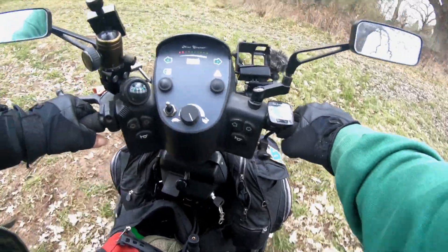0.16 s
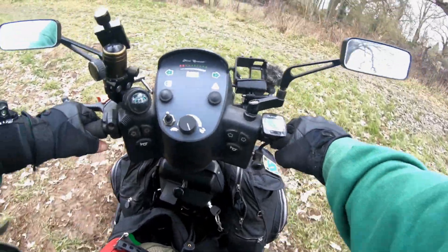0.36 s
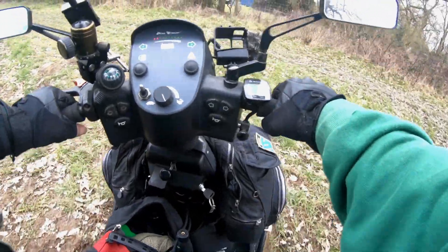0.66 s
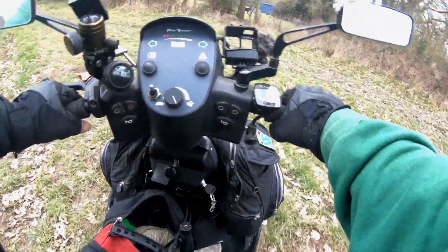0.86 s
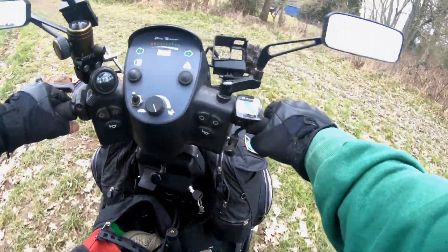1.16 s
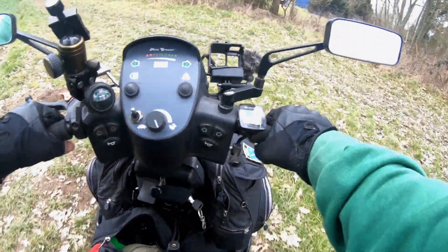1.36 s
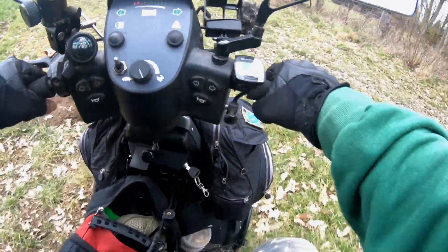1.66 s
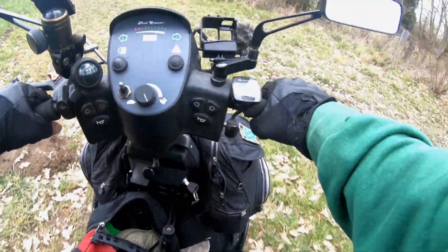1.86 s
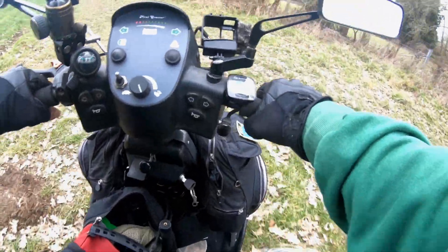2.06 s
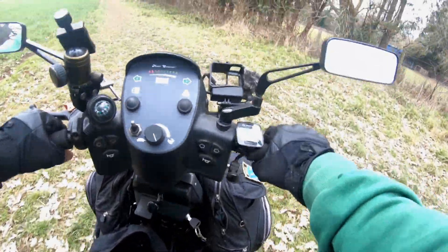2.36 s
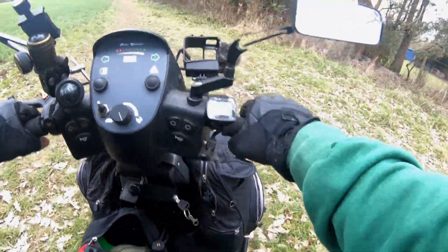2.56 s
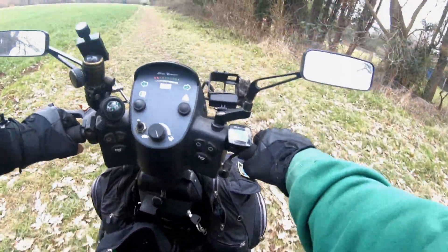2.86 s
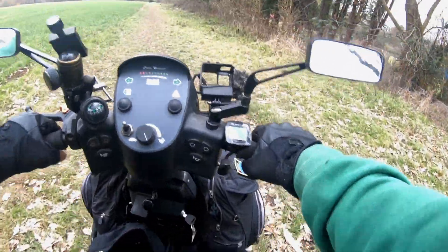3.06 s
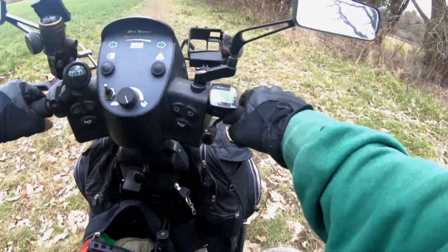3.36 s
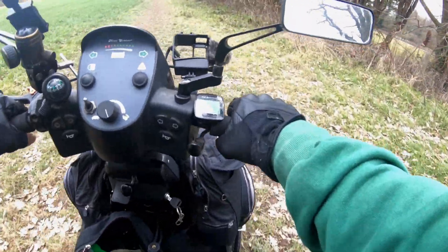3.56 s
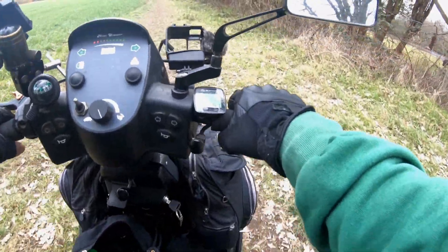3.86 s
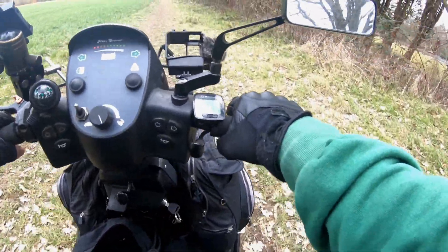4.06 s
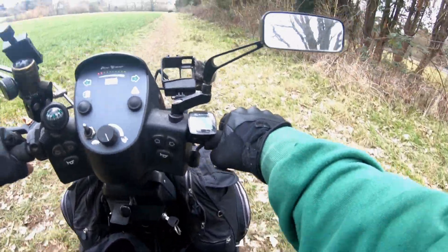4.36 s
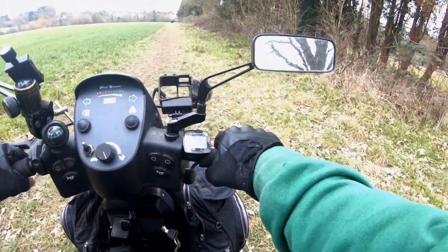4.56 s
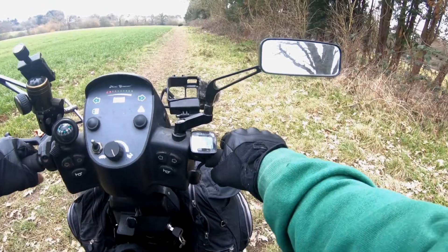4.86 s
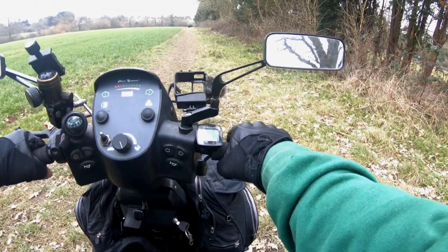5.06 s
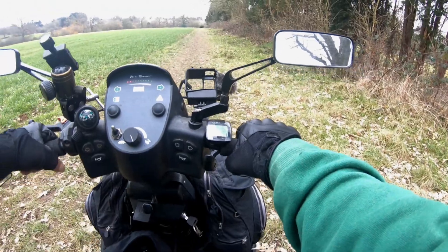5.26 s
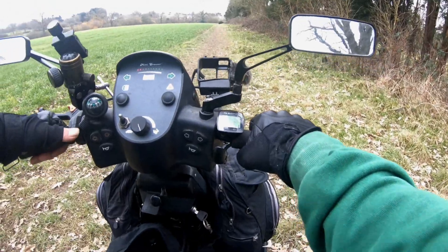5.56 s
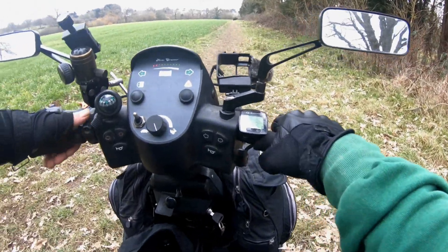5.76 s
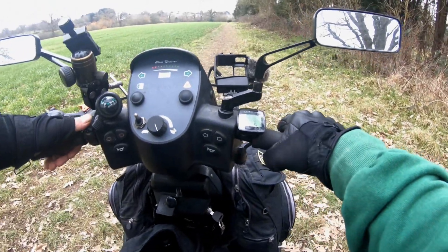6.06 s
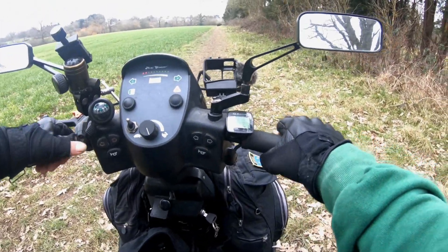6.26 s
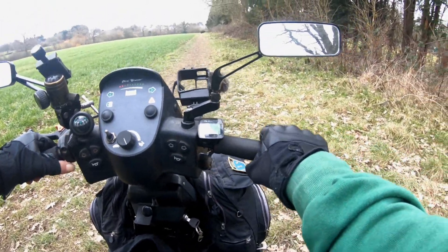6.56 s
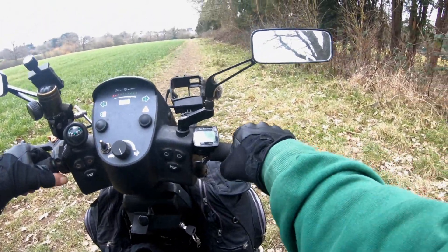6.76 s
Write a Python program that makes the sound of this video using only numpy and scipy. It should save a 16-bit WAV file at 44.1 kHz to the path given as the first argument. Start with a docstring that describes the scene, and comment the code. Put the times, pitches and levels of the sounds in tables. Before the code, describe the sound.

Hollow thumps, panel knocks and metallic rattles from a scooter on bumpy ground, with crackling leaves and thin bird notes, easing into quiet.

```python
"""Mobility scooter on a bumpy track

An electric scooter rolls over leaf-strewn grass and slows down, heard at the rider's chest. Filtered noise
rocks the microphone, booms in the plastic body and crackles as leaves. Fading tones make the knocks and ticks;
sliding tones make the braking motor's whine and a small bird's falling notes in the hedge."""
import sys
import numpy as np
from scipy import signal
from scipy.fft import rfft, irfft, next_fast_len
from scipy.io import wavfile
from scipy.ndimage import uniform_filter1d, map_coordinates

SR = 44100
rng = np.random.default_rng(int(sys.argv[2]) if len(sys.argv) > 2 else 0)


def output_pcm(signal):
    """Save a mono or channel-first signal as 16-bit PCM at the path in sys.argv[1].

    Samples are clipped to [-1, 1] before scaling.
    """
    pcm = np.clip(np.atleast_2d(signal).T, -1, 1) * 32767
    wavfile.write(sys.argv[1], SR, np.round(pcm).astype(np.int16))


N = 304290
T = np.arange(N) / SR  # time of each sample [s]

# How the ride drives the wheels and leaves, before boom() turns the shaking down:
# (time [s], body shaking [dB], leaf crackle [dB], tyre roll [dB])
RIDE_LEVELS = [(0.0, -38, -56.5, -54), (0.2, -35.5, -56.5, -53.5), (0.6, -34, -56.5, -53),
               (1.0, -32.5, -56.5, -51), (1.3, -33, -57.5, -56), (1.62, -32, -53.5, -50.5),
               (2.0, -30, -54.5, -56), (2.25, -30.5, -49, -48), (2.5, -33.5, -52, -49.5),
               (2.8, -32.5, -58, -46.5), (3.08, -35, -54, -54), (3.5, -34.5, -56, -56),
               (3.85, -35.5, -50, -53.5), (3.97, -38, -60.5, -60), (4.2, -35, -58.5, -56),
               (4.6, -38.5, -60.5, -56), (4.85, -43.5, -67, -59.5), (5.05, -50, -71, -60.5),
               (5.3, -44.5, -66, -58), (5.55, -50, -60.5, -58), (6.05, -53.5, -66, -64.5),
               (6.35, -50, -61, -61.5), (6.9, -59, -63.5, -59)]
# Ringing of the hollow plastic shell: (frequency [Hz], width [Hz], level [dB])
SHELL_MODES = [(257.5, 28.2, -4), (332.7, 35.4, -5), (351.8, 40.8, -5.5), (426, 13, -23.5)]
# Ringing of the wheel mounting, applied twice: (frequency [Hz], width of one pass [Hz], level [dB])
WHEEL_MODES = [(210.5, 65.6, 0)]
# Thuds of a wheel on a lump, before boom() turns them down:
# (time [s], strength [dB], wheel mounting relative to shell [dB])
BUMPS_HIT = [(0.038, -38, 14), (0.113, -25.5, -6), (0.19, -30.5, -4), (0.25, -39, 10), (0.39, -55, -2),
             (0.519, -34, 4), (0.676, -24.5, -7), (0.846, -25.5, -4), (0.95, -50, 21), (1.17, -37, -12),
             (1.55, -33.5, 6), (2.129, -21.5, -11), (2.209, -17, -0.5), (2.33, -32, -13), (2.57, -32, -7),
             (2.66, -31, -15), (2.75, -23, -25), (2.84, -28, -3), (3.02, -41.5, 8), (3.19, -40, 16),
             (3.245, -30, 3), (3.298, -26, 5), (3.38, -48, 20.5), (3.469, -32.5, 6), (3.52, -43, 16),
             (3.56, -49, 10), (3.66, -51, 20), (3.75, -47, 14), (3.982, -29.5, 3.5), (4.059, -24, -8),
             (4.15, -38, -20), (4.458, -37.5, 7.5), (5.268, -44.5, 3), (5.31, -51, -5), (5.38, -43, -1),
             (5.45, -43, -9), (5.7, -51, -2), (5.82, -50, -6), (5.979, -42.5, -4.5), (6.26, -47, 1),
             (6.378, -45, -23), (6.42, -43, -20), (6.455, -41, -21), (6.5, -42, -20), (6.549, -39.5, -9),
             (6.63, -43, -3), (6.66, -44, -8), (6.891, -41.5, -19)]
BUMP_RISE_S, BUMP_FALL_S = 0.018, 0.025
STEADY_S = 0.018  # a thud's ring keeps an even strength over this time
# wheel mounting relative to shell; extra gain per dB of shaking; random swing
WHEEL_DB, WHEEL_GROWS, WHEEL_SWING_DB = 1.5, 0.53, 1

# Panels knocking: (time [s], peak [dB], favoured frequency [Hz], change per octave from KNOCK_HZ [dB])
PANEL_KNOCKS = [(0.108, -15.5, 1110, 0), (0.112, -19, 470, -8), (0.237, -21, 546, -2.5),
                (0.32, -24.5, 517, -7), (0.385, -30, 536, -14), (0.485, -24, 528, -2.5),
                (0.562, -30.5, 485, -9), (0.666, -17.5, 543, 1.5), (0.834, -26.5, 880, -1),
                (1.024, -25, 482, 3), (1.111, -31, 482, -9), (1.158, -23.5, 573, -4),
                (1.313, -24.5, 585, -5), (1.544, -23.5, 890, -0.5), (1.589, -20.5, 649, -5.5),
                (1.955, -24.5, 566, -6.5), (2.016, -30, 547, -7), (2.062, -31, 622, -7),
                (2.133, -18, 511, -1), (2.192, -20.5, 522, -3), (2.206, -18.5, 517, -2.5),
                (2.303, -22, 854, -3), (2.556, -17, 519, -8), (2.596, -29, 576, -14),
                (2.615, -21.5, 525, -12), (2.673, -25, 536, -10), (2.688, -18, 510, -3),
                (2.728, -26.5, 595, -15), (2.906, -26, 485, -14), (2.948, -33, 506, -7),
                (3.124, -29, 528, -8), (3.138, -31, 554, -10), (3.235, -28.5, 525, -3),
                (3.293, -28.5, 627, -8), (3.298, -24, 856, -6.5), (3.401, -35, 490, -9),
                (3.467, -32.5, 534, -11), (3.52, -31.5, 490, -9), (3.576, -33, 495, -5),
                (3.612, -35, 560, -5), (3.701, -37, 482, -3), (3.752, -31.5, 501, -8),
                (3.966, -31, 533, -3), (4.038, -32, 633, -5), (4.051, -25.5, 533, -5),
                (4.094, -25, 480, -7), (4.132, -26.5, 557, -9), (4.14, -25, 1040, -10),
                (4.181, -24.5, 482, -6.5), (4.191, -29, 592, -7), (4.261, -33, 550, -9),
                (4.771, -34.5, 536, -11), (5.441, -34, 474, -10), (6.235, -34.5, 711, -6),
                (6.353, -34, 745, 2.5), (6.357, -26, 746, -4.5), (6.407, -38, 560, -11),
                (6.538, -35.5, 1000, -4), (6.689, -38, 505, -7)]
# Ringing of the panels: (frequency [Hz], level [dB])
PANEL_MODES = [(355, 2.5), (415, 2.5), (520, 2), (630, -4.5), (740, 1), (900, 6.5), (1020, -8.5),
               (1150, 3.5), (1350, -5), (1500, -6.5), (1700, -9.5), (1870, -31), (2050, -16), (2330, -23),
               (2600, -42), (3000, 0.5), (3500, -6.5)]
KNOCK_HZ, KNOCK_CHATTER_S = 422, 0.008
FAVOUR_DB, FAVOUR_OCTAVES = 5.5, 0.14  # lift of the modes near the struck spot; its width
STRAY_KNOCKS = 50
STRAY_KNOCK_DB, STRAY_BRIGHT_DB = -1, -8  # mid values: relative to shaking; change per octave

# Loose fittings ticking: (time [s], peak of the ring [dB], favoured frequency [Hz])
FITTING_TICKS = [(0.0154, -42, 3360), (0.1052, -22, 3140), (0.1834, -46, 5000), (0.1984, -43, 5000),
                 (0.2369, -40.5, 3020), (0.5526, -41, 4500), (0.5731, -42, 4000), (0.6195, -44, 4000),
                 (0.6674, -36, 4550), (0.682, -38, 4500), (0.697, -36, 4800), (0.706, -44, 4400),
                 (0.7214, -41, 2960), (0.833, -39, 3500), (0.857, -31, 3070), (0.8814, -36, 4580),
                 (1.0221, -33, 4370), (1.029, -40, 3000), (1.1563, -45, 2340), (1.186, -47, 3800),
                 (1.237, -47, 4200), (1.265, -49, 5300), (1.281, -57, 4800), (1.3139, -37, 4000),
                 (1.34, -45, 3000), (1.45, -49, 5000), (1.505, -45, 4600), (1.5833, -43, 2300),
                 (1.592, -36.5, 4680), (1.678, -43.5, 3000), (1.7295, -38.5, 3500), (1.75, -41, 5000),
                 (1.81, -45, 4300), (1.83, -43.5, 4300), (1.91, -50, 4000), (1.936, -44, 4000),
                 (1.9579, -41, 6000), (1.98, -54, 6300), (2.005, -45, 4500), (2.02, -50, 4200),
                 (2.0882, -36, 5500), (2.1131, -31, 2330), (2.1284, -32, 4480), (2.163, -42, 8400),
                 (2.1905, -24, 4500), (2.208, -32, 4000), (2.2288, -30, 4350), (2.243, -37, 4500),
                 (2.252, -38, 4500), (2.26, -47, 3300), (2.278, -56, 4400), (2.3082, -34, 4250),
                 (2.3526, -37, 2870), (2.5356, -35, 2780), (2.5704, -47, 3590), (2.687, -44, 2480),
                 (2.7028, -29.5, 4370), (2.7746, -12, 4200), (2.8, -33, 4700), (2.8254, -43, 2320),
                 (2.834, -39, 3800), (2.841, -40, 3500), (2.8534, -43, 7000), (2.8863, -36, 2920),
                 (2.8974, -36.5, 3500), (2.906, -39, 3200), (2.915, -40, 3600), (2.926, -42, 3500),
                 (2.976, -47, 3500), (3.019, -55, 5500), (3.1208, -41, 4280), (3.225, -42, 3500),
                 (3.2944, -36, 2830), (3.4416, -36, 3500), (3.4644, -43, 3290), (3.69, -43, 3310),
                 (3.8033, -42, 2890), (3.9679, -37.5, 4260), (3.984, -45, 4200), (4.037, -47, 2900),
                 (4.0542, -45, 4500), (4.064, -42, 3600), (4.076, -45, 4300), (4.115, -45, 4000),
                 (4.1315, -43, 3230), (4.151, -45, 4800), (4.183, -47, 3500), (4.215, -48, 3300),
                 (4.231, -50, 3500), (4.4608, -41, 3500), (4.69, -47, 3500), (4.72, -53, 4300),
                 (4.7401, -45, 4000), (4.7721, -47, 3260), (5.1781, -53, 2800), (5.2175, -51, 4000),
                 (5.245, -48.5, 3770), (5.3732, -40.5, 3480), (5.4395, -41.5, 2400), (6.2083, -48, 3300),
                 (6.2332, -39, 4400), (6.3565, -45, 3600), (6.536, -39, 4940), (6.542, -47, 3600)]
# Ringing of the fittings: (frequency [Hz], level [dB])
FITTING_MODES = [(2400, 3), (2900, 2), (3354, 12), (3650, 10), (3950, 5), (4366, 13.5), (4780, 12),
                 (5329, 8.5), (5700, 0.5), (6150, -12), (6700, -8), (7300, -13), (8350, 4.5), (9400, -28),
                 (11300, -36), (13800, -40)]
# level per octave away from the favoured mode; chatter of the loudest; 60 dB decay of the lowest mode
TICK_FOCUS_DB, TICK_CHATTER_S, TICK_T60_S = -11.5, 0.0021, 0.0084
CHATTER_GROWS = 0.21  # softer contacts chatter longer: dB of length per dB under the loudest
# bright snap of the loudest tick, before its colouring; 60 dB decay; gain per dB of tick
CRACK_DB, CRACK_S, CRACK_GROWS = -29.5, 0.003, 0.57
# Colour of that snap, strongest near 6 kHz: filter weights, one per sample
CRACK_COLOUR = [1, 2, 0, -2, -1]
STRAY_TICKS = 80
JINGLE_DB, STRAY_DB = -12, 6.5  # relative to the crackle: faint contacts; middle of the stray ticks

# A bag rubbing the shell: (time [s], length before stretching by half [s], level [dB], added sizzle [dB])
BAG_SCRAPES = [(0.536, 0.025, -48, -11), (0.654, 0.057, -46.5, -9), (2.205, 0.047, -43, -12),
               (2.297, 0.02, -37, -23), (2.645, 0.064, -55, -10.5), (2.65, 0.19, -48.5, -14),
               (2.824, 0.026, -61, -23), (2.875, 0.045, -55, -9), (3.114, 0.035, -51.5, -19),
               (3.437, 0.074, -52, -14), (3.707, 0.1, -62, -23), (4.023, 0.089, -51, -14),
               (4.5, 0.029, -65, -25), (4.676, 0.072, -59.5, -16), (5.206, 0.026, -63, -18),
               (0.863, 0.026, -47, -27), (1.9, 0.13, -56, -12), (3.953, 0.026, -50, -25),
               (6.525, 0.015, -60, -31)]
# Tone colour of the rub: (frequency [Hz], relative level [dB])
RUB_COLOUR = [(1500, -36), (2300, 0.5), (3300, -2.5), (4400, 6), (5300, -6), (6500, -12), (9000, -70)]
# Tone colour of the sizzle: (frequency [Hz], relative level [dB])
SIZZLE_COLOUR = [(5500, -57), (7500, -8), (8800, -3), (10000, -17), (13000, -28), (15700, -35)]
# Squeaking joints: (time [s], length [s], pitch [Hz], level [dB])
JOINT_SQUEAKS = [(0.767, 0.12, 2080, -52.5), (1.045, 0.15, 4200, -64), (1.289, 0.12, 3410, -59),
                 (1.763, 0.025, 2700, -59), (2.012, 0.12, 4080, -58), (2.347, 0.18, 4380, -58),
                 (2.715, 0.3, 2276, -54), (3.603, 0.25, 4540, -63), (4.496, 0.062, 2930, -54.5),
                 (5.2, 0.15, 4700, -70)]

# Strength of the low movement: (time [s], rocking before the seat limits it [dB], buffeting [dB])
HEAVE_LEVELS = [(0.0, -18.5, -26), (0.17, -5, -26.5), (0.35, -10.5, -29.5), (1.4, -15.5, -33),
                (1.55, -6, -27), (1.88, -17.5, -34), (2.15, -5, -29.5), (2.42, -13, -35.5),
                (2.98, -12, -34), (3.35, -11.5, -33.5), (3.55, -20, -34), (3.8, -17, -31), (3.96, -27, -35),
                (4.08, -16.5, -29), (4.7, -24, -38), (4.9, -17.5, -43), (5.3, -28.5, -39.5),
                (6.9, -27.5, -41)]
# Spectrum of the rocking: (frequency [Hz], relative level [dB])
SWAY_COLOUR = [(.5, -7), (2, 4.5), (8, 2), (14, -23), (22, -76), (40, -120)]
# Spectrum of the buffeting: (frequency [Hz], relative level [dB])
BUFFET_COLOUR = [(10, -53), (18, 0.5), (40, -6), (75, -18.5), (120, -18), (160, -25.5), (220, -32.5),
                 (400, -120)]

# Tone colour of dry leaves: (frequency [Hz], relative level [dB])
LEAF_COLOUR = [(1060, -3), (1800, -8), (2080, -6), (2450, -7), (3040, -4), (3320, -7), (3840, -5.5),
               (4470, -6), (7340, -19), (11600, -31), (15500, -39)]
# Tone colour of rubber on grass: (frequency [Hz], relative level [dB])
ROLL_COLOUR = [(240, -44), (400, 0), (486, 2.5), (661, -5.5), (815, 0), (912, -1.5), (976, -7),
               (1240, -4.5), (2400, -18), (3120, -49), (5280, -120)]
# leaves breaking: average rate; level relative to crackle; scale of the scatter; 60 dB decay
SNAPS_PER_S, SNAP_DB, SNAP_SPREAD_DB, SNAP_T60_S = 70, -10, 4.5, 0.0094
# A tyre crushing a drift of dry leaves: (time [s], length [s], level [dB])
LEAF_CRUNCHES = [(0.66, 0.07, -65), (1.002, 0.043, -65), (1.93, 0.06, -69), (2.207, 0.073, -63),
                 (2.29, 0.04, -70), (2.66, 0.18, -58), (2.773, 0.16, -68), (2.86, 0.19, -65.5),
                 (3.43, 0.1, -75), (3.698, 0.1, -71), (4.042, 0.096, -67)]
# Tone colour of the crunch: (frequency [Hz], relative level [dB])
CRISP_COLOUR = [(4000, -40), (6500, -2), (9000, 2), (11000, -2), (13000, -6), (15700, -3)]

# Whine while braking: (time [s], gear mesh frequency [Hz])
WHINE_PITCH = [(4.5, 545), (4.62, 497), (4.72, 425), (4.8, 356), (4.86, 310.5), (4.92, 290.3),
               (4.97, 253.7), (5.09, 180), (5.26, 118.3)]
# How loud the main whine comes through the casing: (frequency [Hz], level [dB])
HOUSING_LEVELS = [(170, -70), (205, -55), (245, -51), (270, -46), (295, -41), (345, -41), (375, -51),
                  (400, -62), (425, -46), (460, -50), (500, -50), (520, -56), (560, -75)]
# tone at twice the gear frequency: level; centre and half-width of the range where it sounds
SECOND_DB, SECOND_HZ, SECOND_WIDTH_HZ = -57, 375, 145

# Falling notes: (start [s], length [s], start pitch [Hz], fall before the hook [Hz], level [dB])
BIRD_NOTES = [(-.01, 0.096, 7650, 1200, -56), (0.137, 0.099, 7170, 1530, -56),
              (0.303, 0.079, 6620, 1060, -56), (2.265, 0.11, 7780, 580, -57.5),
              (2.479, 0.114, 7650, 840, -58.5), (2.701, 0.072, 6800, 1050, -50.5),
              (2.9, 0.076, 6670, 1004, -55.5)]
HOOK_HZ = 600  # last quick drop of a note
# Faint chirps: (time [s], start pitch [Hz], peak [dB])
DISTANT_CHIRPS = [(1.443, 7840, -66), (1.727, 7900, -59), (4.39, 7850, -61), (5.75, 7300, -69),
                  (5.88, 7400, -68), (6.17, 7240, -68)]
CHIRP_S = 0.021

# Swelling of a narrow hiss, before hiss() turns it down: (time [s], level [dB])
HISS_LEVELS = [(4.3, -72), (4.41, -61), (4.92, -91), (5.21, -74), (5.43, -72), (5.59, -65), (5.76, -79),
               (5.97, -68), (6.33, -71), (6.78, -62), (6.9, -66)]
# Resonance of the hiss, applied twice: (frequency [Hz], width of one pass [Hz], level [dB])
HISS_MODES = [(4310, 490, 0)]
# Tone colour of the quiet air: (frequency [Hz], relative level [dB])
AIR_COLOUR = [(88, -44), (150, -29), (259, 10), (320, -19.5), (620, -16.5), (988, -1), (2460, -18.5),
              (3700, -22), (4590, -26), (5500, -29), (6770, -29.5), (13600, -33.5), (15600, -40)]
AIR_DB = -57.5
TOP_HZ = 15780  # nothing passes above this


def amp(db):
    """dB to gain."""
    return 10 ** (np.asarray(db) / 20)


def unit(x):
    """Scaled to an average strength (rms) of 1."""
    return x / np.sqrt(np.mean(x ** 2) + 1e-20)


def curves(rows):
    """One value per sample for each column after the time."""
    s, *cols = np.transpose(rows)
    return [np.interp(T, s, c) for c in cols]


def wobble(rate):
    """A smooth random curve with rate random points a second."""
    points = rng.standard_normal(int(N * rate / SR) + 4)
    return map_coordinates(points, [T * rate])


def filtered(x, response):
    """x with each frequency scaled by response, which may also shift its phase."""
    m = next_fast_len(N + SR // 2)
    return irfft(rfft(x, m) * response(np.fft.rfftfreq(m, 1 / SR)), m)[..., :N]


def coloured(x, points):
    """x filtered by a (frequency [Hz], level [dB]) curve, at rms 1."""
    f, db = np.transpose(points)
    return unit(filtered(x, lambda hz: amp(np.interp(np.log(hz + .1), np.log(f + .1), db))))


def resonant(x, modes):
    """x through resonances given as (frequency [Hz], width [Hz], level [dB]), with alternating signs."""
    def response(f):
        return sum((-1) ** k * amp(db) * 1j * f * w / (c * c - f * f + 1j * f * w)
                   for k, (c, w, db) in enumerate(modes))
    return filtered(x, response)


def steady(x):
    """x with its random swells evened out, at rms 1."""
    power = np.abs(uniform_filter1d(x ** 2, round(STEADY_S * SR)))
    return unit(x / np.sqrt(power + .05))


def grainy(spread_db, rate, clump_db):
    """Noise whose samples come in uneven, clumped sizes."""
    size = amp(spread_db * np.minimum(rng.exponential(size=N), 5) + clump_db * wobble(rate))
    return unit(size * rng.standard_normal(N))


def blow(modes, gains_db, t60, chatter, size):
    """Fading tones with random strengths, driven by a short ragged run of contacts, peak 1."""
    t = np.arange(size) / SR
    hz, db = np.transpose(modes)
    draw = rng.standard_normal((2, len(hz)))
    gain = amp(db + gains_db(hz) + 2.5 * draw[0])
    life = t60 * (hz[:, None] / hz[0]) ** -.4  # high modes die sooner
    detuned = hz * (1 + 0.015 * draw[1])
    ring = amp(-60 * t / life) * np.sin(2 * np.pi * np.outer(detuned, t))
    ring *= 1 - np.exp(-t / 0.00057)  # soft onset
    fade = np.exp(-t / max(chatter, .0005))
    contacts = rng.standard_normal(len(t)) ** 3 * fade * (1 + np.minimum(t / 0.00092, 1))
    contacts[0] = 4  # the first contact is firm
    driven = signal.fftconvolve(ring, contacts[None], axes=1)[:, :len(t)]
    # each mode keeps its strength
    strength = gain * np.linalg.norm(ring, axis=1) / np.linalg.norm(driven, axis=1)
    ring = strength @ driven
    return ring / np.abs(ring).max()


def boom():
    """Lumpy ground jolts the wheels; tyres and springs pass only a band of jolts to the hollow body."""
    shake_db = curves(RIDE_LEVELS)[0]
    shell = amp(shake_db + 0.49 * wobble(9))
    wheel_db = WHEEL_DB + WHEEL_GROWS * (shake_db - shake_db.mean()) + WHEEL_SWING_DB * wobble(15)
    wheel = shell * amp(wheel_db)
    shell_thud, wheel_thud = np.zeros((2, N))
    for s, db, extra_db in BUMPS_HIT:
        width = np.where(T < s, BUMP_RISE_S, BUMP_FALL_S)
        thud = amp(db) * np.exp(-((T - s) / width) ** 2)
        shell_thud += thud
        wheel_thud += amp(extra_db) * thud

    def suspension(f):
        return (1j * f / 170) ** 3 / (1 + 1j * f / 170) ** 3 / (1 + 1j * f / 500)

    jolts = filtered(grainy(spread_db=2.5, rate=47, clump_db=-1.5), suspension)
    body = unit(resonant(jolts, SHELL_MODES))
    mount = unit(resonant(resonant(jolts, WHEEL_MODES), WHEEL_MODES))
    rolling = shell * body + wheel * mount
    thuds = shell_thud * steady(body) + wheel_thud * steady(mount)
    return amp(-7.0) * (rolling + thuds)


def knocks():
    """Panels knock on the frame; hard contacts are bright, padded ones dull; softer ones come at random."""
    out = np.zeros(N + SR)
    u = rng.random((STRAY_KNOCKS, 4))
    when = u[:, 0] * T[-1]
    level_db = np.interp(when, T, curves(RIDE_LEVELS)[0]) + STRAY_KNOCK_DB + 8 * (u[:, 1] - .5)
    stray = np.c_[when, level_db, 450 * 2 ** (1.5 * u[:, 3]), STRAY_BRIGHT_DB + 8 * (u[:, 2] - .5)]
    for s, db, hz0, bright_db in [*PANEL_KNOCKS, *stray]:
        def colour_db(hz):
            near = np.exp(-(np.log2(hz / hz0) / FAVOUR_OCTAVES) ** 2)
            return bright_db * np.abs(np.log2(hz / KNOCK_HZ)) + FAVOUR_DB * near

        ring = blow(PANEL_MODES, colour_db, t60=0.026, chatter=KNOCK_CHATTER_S, size=3000)
        out[round(s * SR):][:len(ring)] += amp(db) * ring
    return out[:N]


def ticks():
    """Loose fittings tick, each contact favouring the modes near its own spot; extra ones come at random."""
    out = np.zeros(N + SR)
    u = rng.random((STRAY_TICKS, 3))
    when = u[:, 0] * T[-1]
    level_db = np.interp(when, T, curves(RIDE_LEVELS)[1]) + STRAY_DB + 8 * (u[:, 1] - .5)
    stray = np.c_[when, level_db, 2300 * 2 ** (1.2 * u[:, 2])]
    loudest_db = np.max(FITTING_TICKS, 0)[1]
    for s, db, hz0 in [*FITTING_TICKS, *stray]:
        def focus_db(hz):
            return TICK_FOCUS_DB * np.abs(np.log2(hz / hz0))

        chatter = TICK_CHATTER_S * amp(CHATTER_GROWS * (loudest_db - db))
        ring = blow(FITTING_MODES, focus_db, t60=TICK_T60_S, chatter=chatter, size=1400)
        crack_db = CRACK_DB + CRACK_GROWS * (db - loudest_db) - 60 * T[:len(ring)] / CRACK_S
        ring += amp(crack_db) * np.convolve(rng.standard_normal(len(ring)), CRACK_COLOUR, "same")
        out[round(s * SR):][:len(ring)] += amp(db) * ring
    return out[:N]


def jingle():
    """Between the clear ticks, many faint soft contacts keep the fittings ringing, following the crackle."""
    hits = rng.random(N) < 500 / SR  # about 500 a second
    size = amp(3.5 * np.minimum(rng.exponential(size=N), 3))
    contacts = hits * size * rng.standard_normal(N)
    ring = resonant(contacts, [(hz, 90, db) for hz, db in FITTING_MODES])
    softened = unit(filtered(ring, lambda f: 1 / (1 + (f / 6000) ** 6)))
    return amp(curves(RIDE_LEVELS)[1] + JINGLE_DB) * softened


def scrapes():
    """A bag's cloth and buckles rub in short grainy strokes, each with its own share of sizzle."""
    rub, sizzle = np.zeros((2, N))
    for s, length, db, sizzle_db in BAG_SCRAPES:
        stroke = np.hanning(round(1.5 * length * SR))
        rub[round(s * SR):][:len(stroke)] += amp(db) * stroke
        sizzle[round(s * SR):][:len(stroke)] += amp(db + sizzle_db) * stroke
    grains = grainy(spread_db=5, rate=110, clump_db=3.5)
    return rub * coloured(grains, RUB_COLOUR) + sizzle * coloured(grains, SIZZLE_COLOUR)


def squeaks():
    """Rubbing joints sing briefly on one pitch, made fuzzy by uneven grip."""
    out = np.zeros(N)
    for s, length, hz, db in JOINT_SQUEAKS:
        t = np.arange(round(length * SR)) / SR
        grip = signal.lfilter([1], [1, -.988], rng.standard_normal(len(t)))
        tone = unit(grip * np.sin(2 * np.pi * hz * t))
        out[round(s * SR):][:len(t)] += amp(db) * np.sqrt(np.hanning(len(t))) * tone
    return out


def heave():
    """Bumps rock rider and microphone below hearing, within the seat's travel; air buffets the microphone."""
    heave_db, buffet_db = curves(HEAVE_LEVELS)
    sway = amp(heave_db) * coloured(rng.standard_normal(N), SWAY_COLOUR)
    buffet = coloured(amp(2.2 * wobble(8)) * rng.standard_normal(N), BUFFET_COLOUR)
    limited = 0.36 * np.tanh(sway / 0.37)  # the seat can only move so far
    return limited + amp(buffet_db) * buffet


def tyres():
    """Dry leaves crackle in clumps over the duller roll of rubber on grass."""
    crackle_db, roll_db = curves(RIDE_LEVELS)[1:]
    shared = 1.5 * np.tanh(wobble(15) / 1.5)  # swells without extremes
    leaf_grains = grainy(spread_db=3, rate=130, clump_db=0.5)
    crackle = coloured(amp(3.4 * shared) * leaf_grains, LEAF_COLOUR)
    roll_grains = grainy(spread_db=4, rate=70, clump_db=1.5)
    roll = coloured(amp(.6 * shared) * roll_grains, ROLL_COLOUR)
    return amp(crackle_db) * crackle + amp(roll_db) * roll


def snaps():
    """Single leaves break with sharp little cracks at irregular moments."""
    hits = rng.random(N) < SNAPS_PER_S / SR
    breaks = hits * amp(SNAP_SPREAD_DB * np.minimum(rng.exponential(size=N), 3))
    burst = signal.fftconvolve(breaks, amp(-60 * T[:600] / SNAP_T60_S))[:N]
    cracks = coloured(burst * rng.standard_normal(N), LEAF_COLOUR)
    return amp(curves(RIDE_LEVELS)[1] + SNAP_DB) * cracks


def crunch():
    """A tyre crushes drifts of dry leaves: crisp, dense grains in short swells."""
    swell = np.zeros(N)
    for s, length, db in LEAF_CRUNCHES:
        stroke = np.hanning(round(length * SR))
        swell[round(s * SR):][:len(stroke)] += amp(db) * stroke
    return swell * coloured(grainy(spread_db=-2.0, rate=69, clump_db=6), CRISP_COLOUR)


def motor():
    """The gear whine falls as the scooter brakes; its two tones sound as they cross the casing's range."""
    hz, = curves(WHINE_PITCH)
    first = amp(np.interp(hz, *np.transpose(HOUSING_LEVELS)))
    turn = 2 * np.pi * np.cumsum(hz * (1 + 0.0081 * wobble(40))) / SR
    in_range = np.exp(-((2 * hz - SECOND_HZ) / SECOND_WIDTH_HZ) ** 4)
    second = amp(SECOND_DB + 2.5 * wobble(35)) * in_range
    on = (T > WHINE_PITCH[0][0]) & (T < WHINE_PITCH[-1][0])
    flutter = amp(1.6 * wobble(30))
    return np.sqrt(2) * on * flutter * (first * np.sin(turn) + second * np.sin(2 * turn))


def bird():
    """Pure falling whistles that hook down at the end, with a short leafy echo."""
    out = np.zeros(N)
    for start, length, start_hz, fall_hz, db in BIRD_NOTES:
        u = np.clip((T - start) / length, 0, 1)  # 0 to 1 through the note
        hz = start_hz - fall_hz * u - HOOK_HZ * u ** 9
        shape = np.clip(u / 0.11, 0, 1) * np.clip((1 - u) / 0.1, 0, 1) * (0.56 + 0.42 * u)
        out += np.sqrt(2) * amp(db) * shape * np.sin(2 * np.pi * np.cumsum(hz) / SR)
    out *= amp(2.4 * wobble(90))
    t = np.arange(SR // 4) / SR
    tail = rng.standard_normal(len(t)) * amp(-60 * t / 0.25)
    echo = signal.fftconvolve(out, tail / np.linalg.norm(tail))[:N]
    return out + amp(-3.5) * echo


def far_bird():
    """Faint short chirps from further along the hedge, each a tone sliding slightly down."""
    out = np.zeros(N)
    t = np.arange(round(CHIRP_S * SR)) / SR
    for s, hz, db in DISTANT_CHIRPS:
        tone = np.sin(2 * np.pi * hz * t * (1 - 0.017 * t / CHIRP_S))
        out[round(s * SR):][:len(t)] += amp(db) * np.hanning(len(t)) * tone
    return out


def hiss():
    """Noise through a narrow resonance makes a soft hiss that swells and fades late in the ride."""
    band = unit(resonant(resonant(rng.standard_normal(N), HISS_MODES), HISS_MODES))
    return amp(curves(HISS_LEVELS)[0] - 7.5 + 0.72 * wobble(5.9)) * band


def quiet_air():
    """The quiet air of the field: steady coloured noise."""
    return amp(AIR_DB) * coloured(rng.standard_normal(N), AIR_COLOUR)


def scene():
    """All sources together over the quiet air of the field."""
    rattles = knocks() + ticks() + jingle() + scrapes() + squeaks()
    ground = tyres() + snaps() + crunch()
    birds = bird() + far_bird()
    return (boom() + rattles + heave() + ground + motor() + birds + hiss() + quiet_air())[None]


def record(dry):
    """Nothing passes above the band limit; the straight drift from first to last sample is kept as it is."""
    drift = np.linspace(dry[:, 0], dry[:, -1], N, axis=1)
    return drift + filtered(dry - drift, lambda hz: hz < TOP_HZ)


dry = scene()
out = record(dry)
output_pcm(out)
```